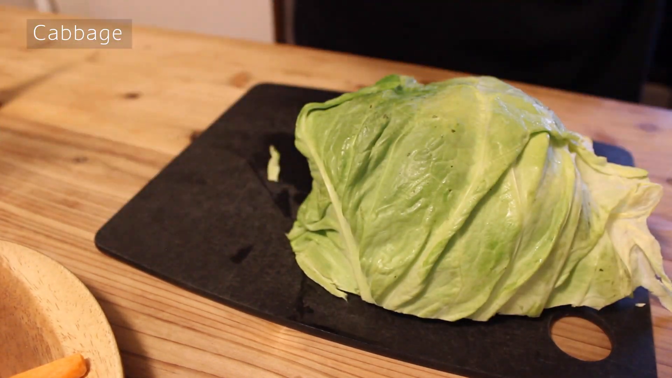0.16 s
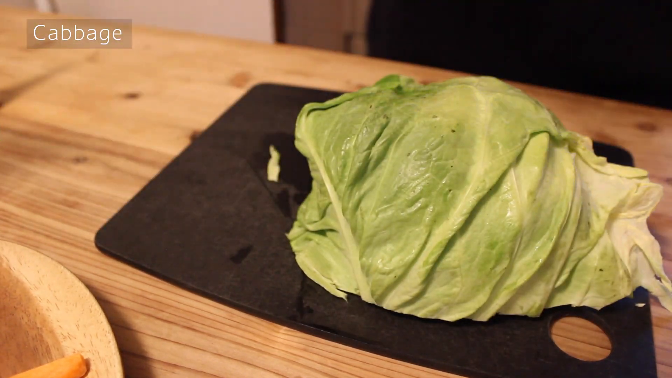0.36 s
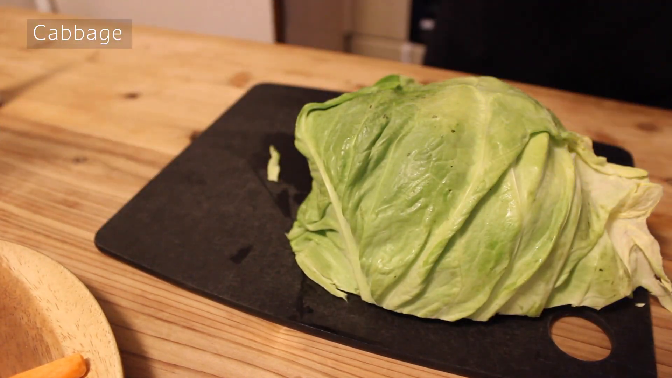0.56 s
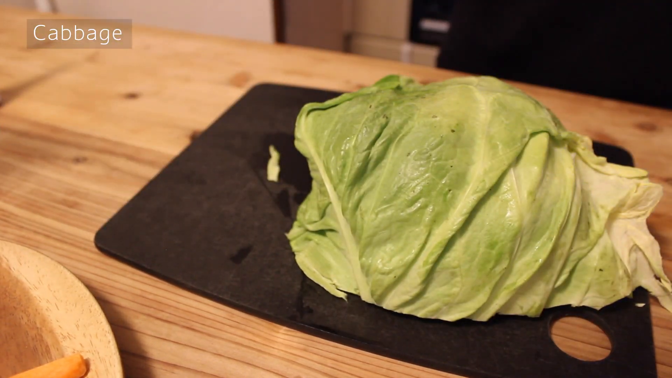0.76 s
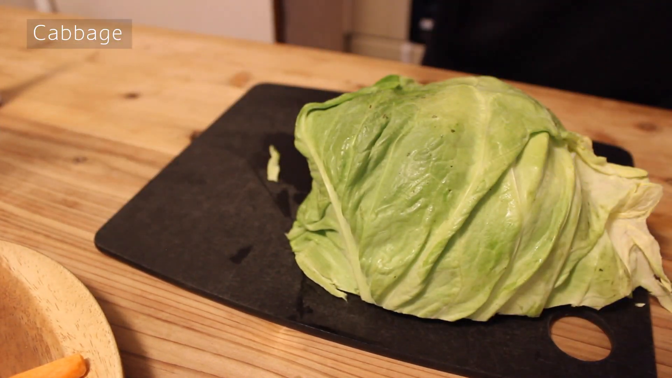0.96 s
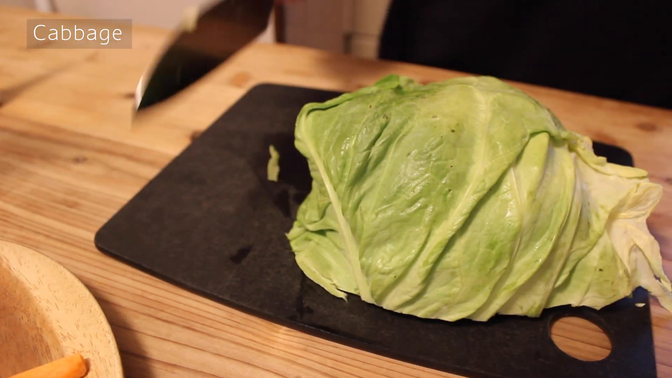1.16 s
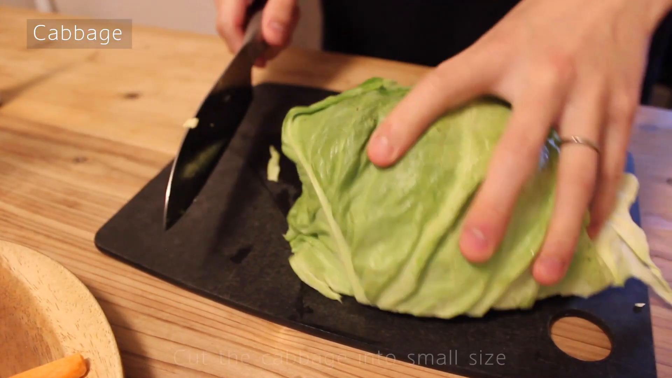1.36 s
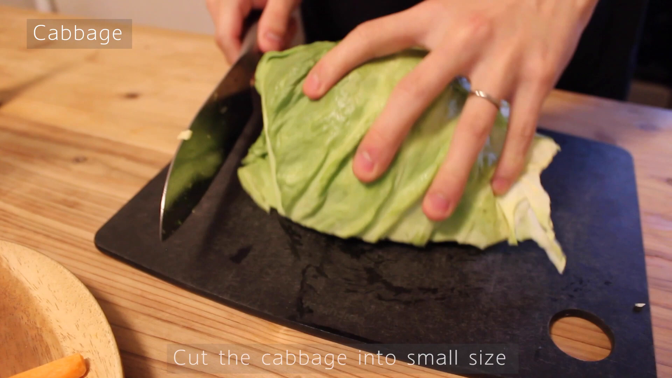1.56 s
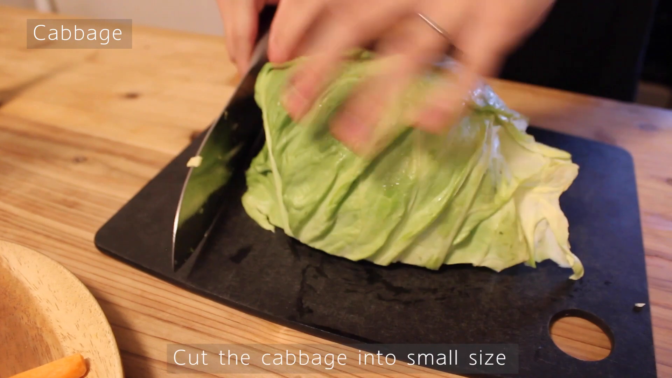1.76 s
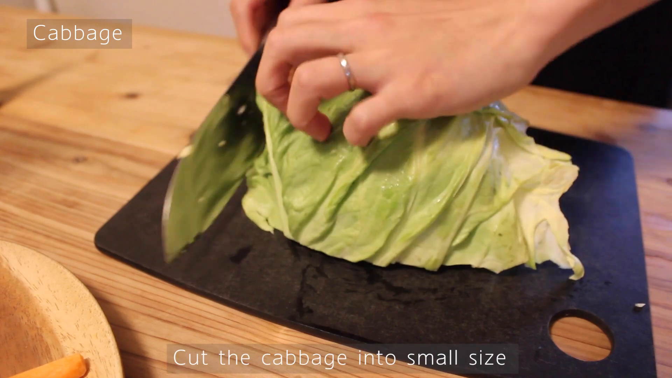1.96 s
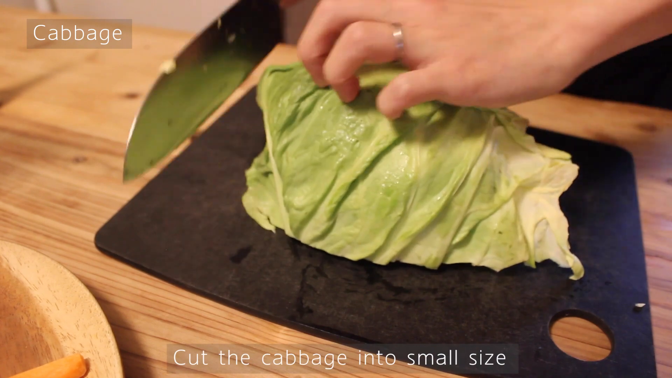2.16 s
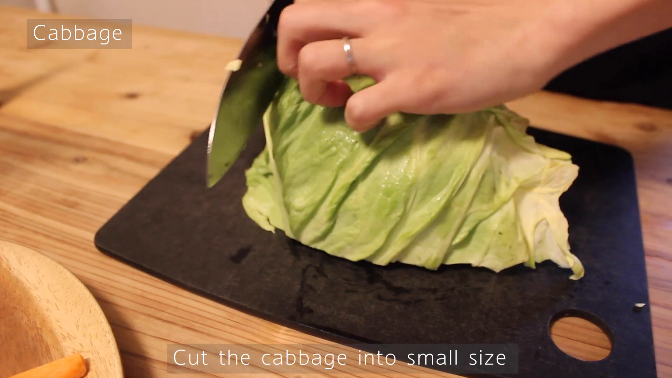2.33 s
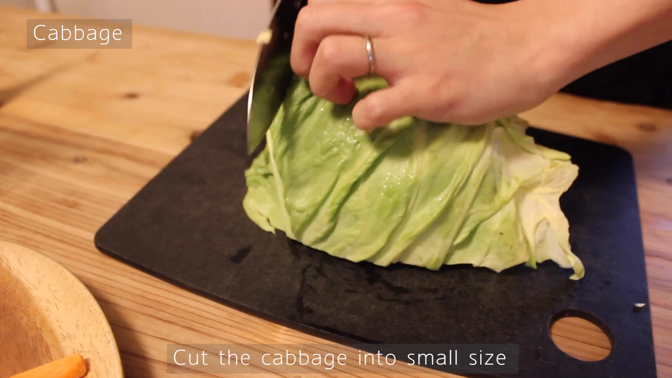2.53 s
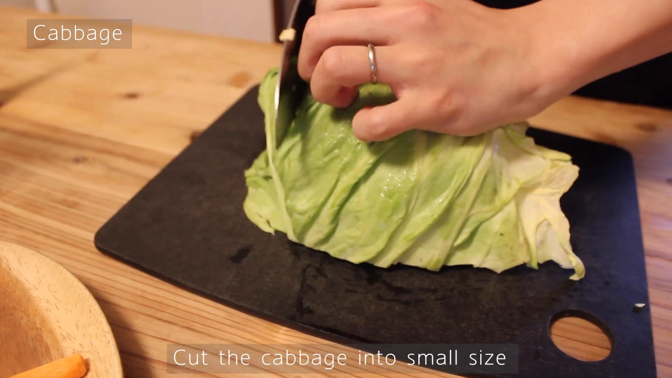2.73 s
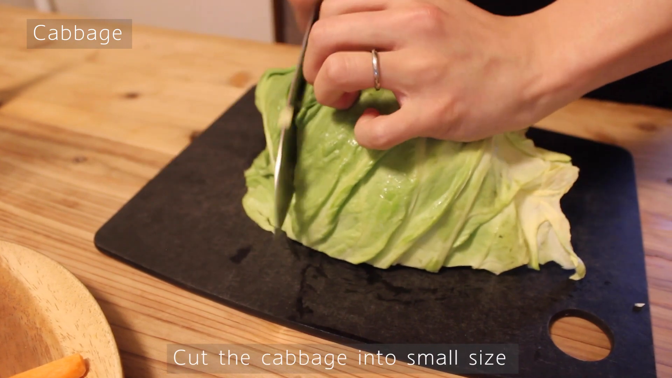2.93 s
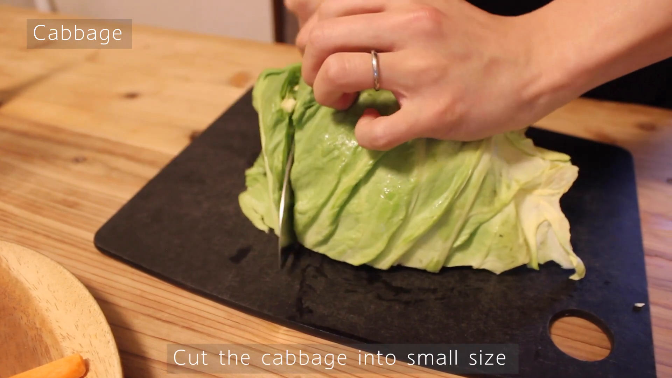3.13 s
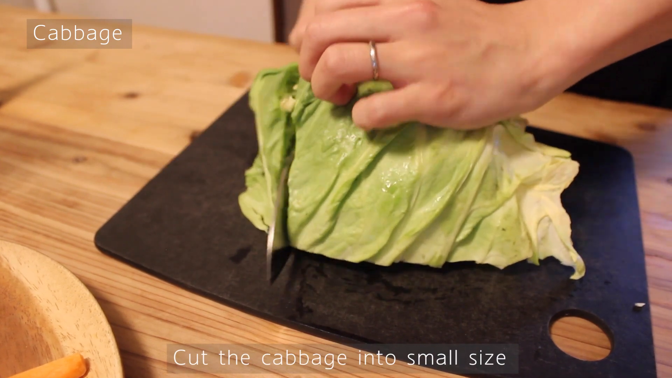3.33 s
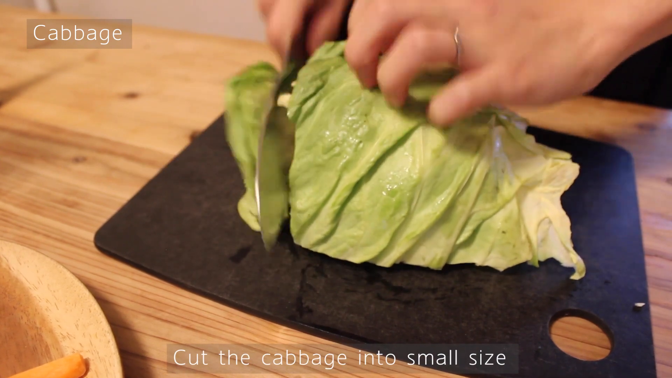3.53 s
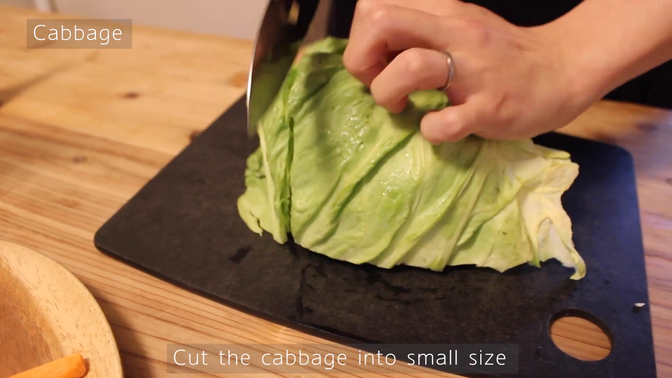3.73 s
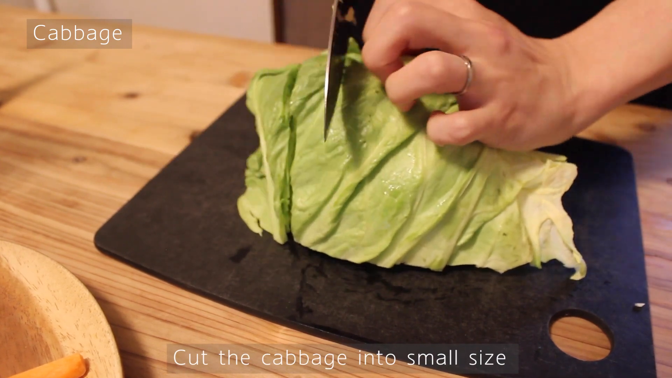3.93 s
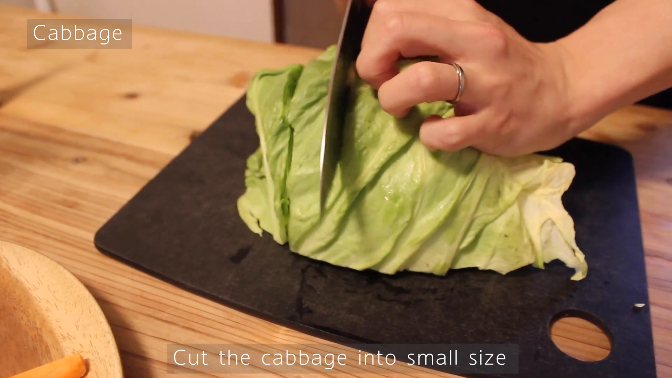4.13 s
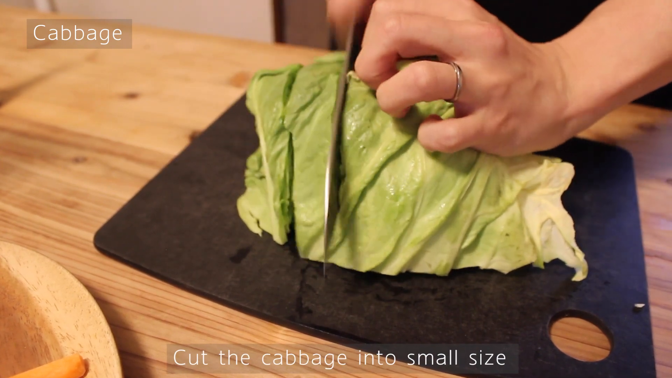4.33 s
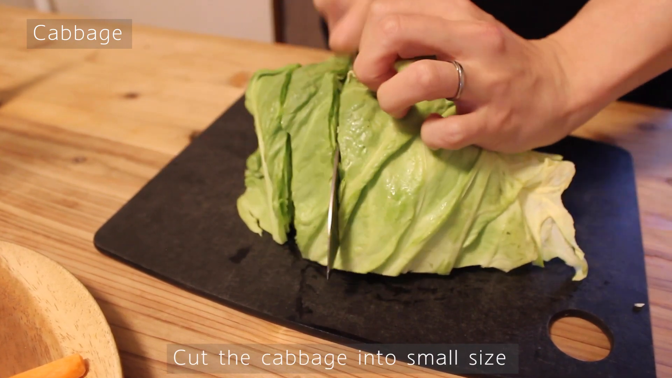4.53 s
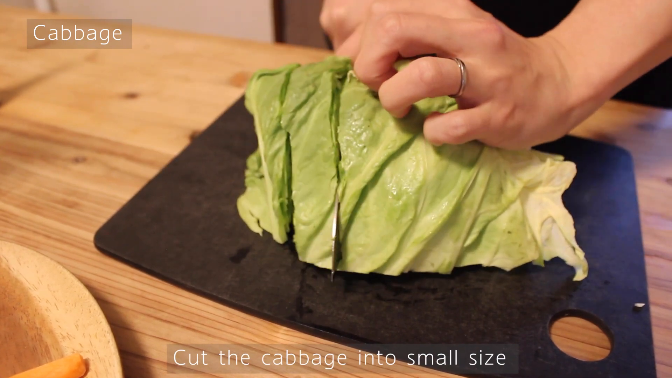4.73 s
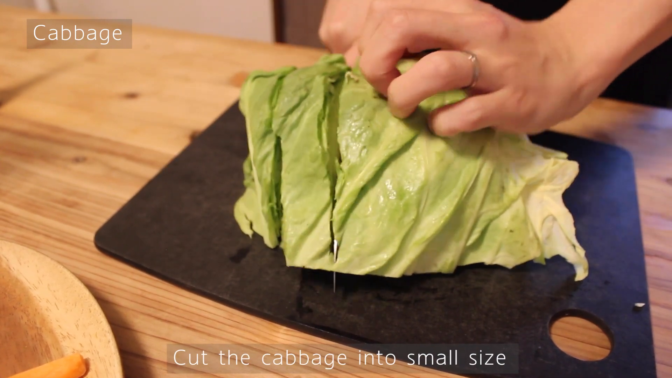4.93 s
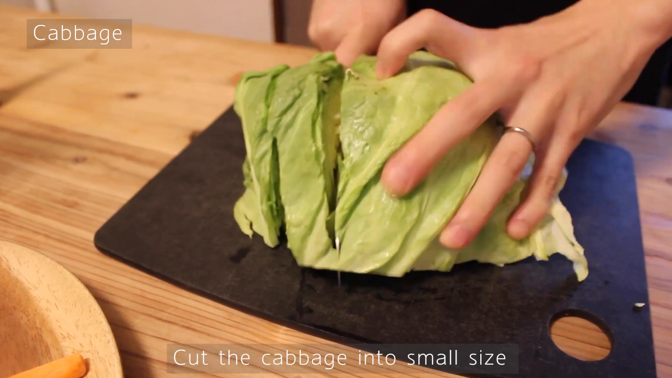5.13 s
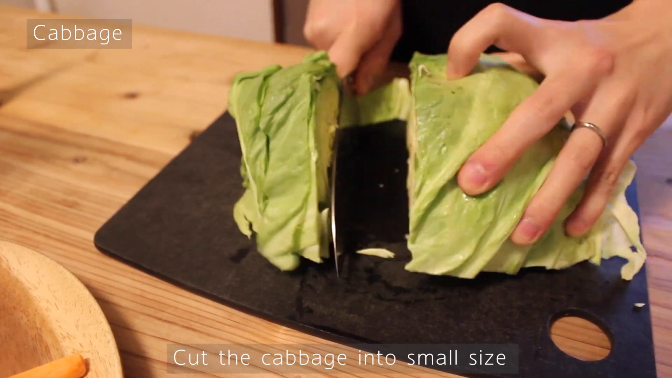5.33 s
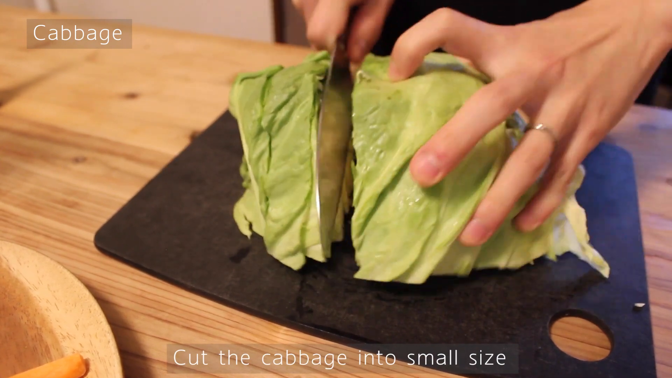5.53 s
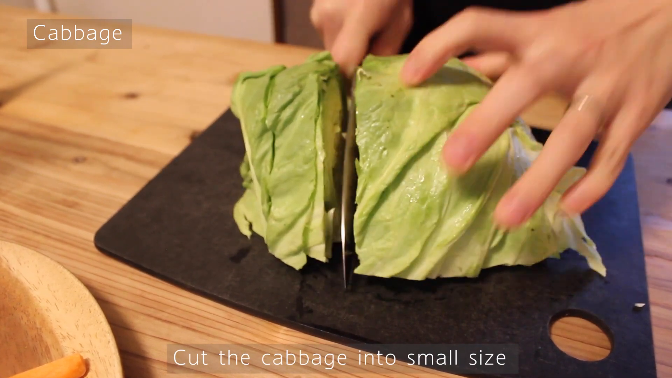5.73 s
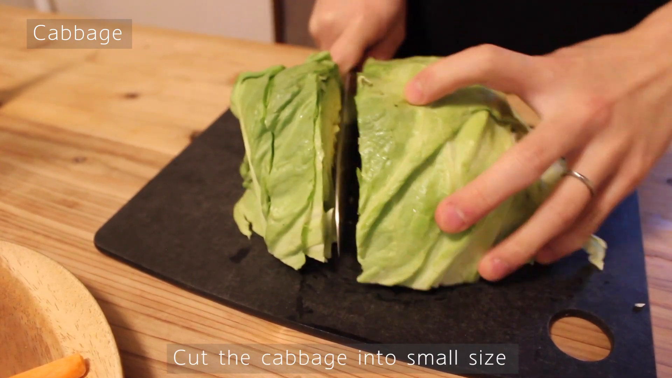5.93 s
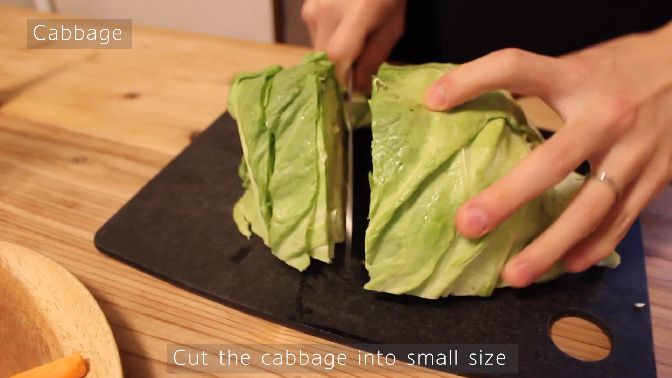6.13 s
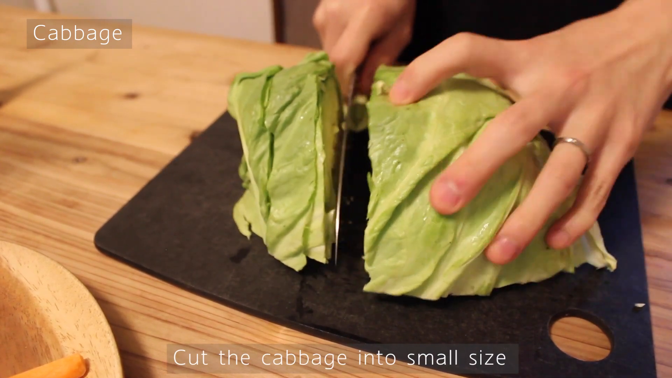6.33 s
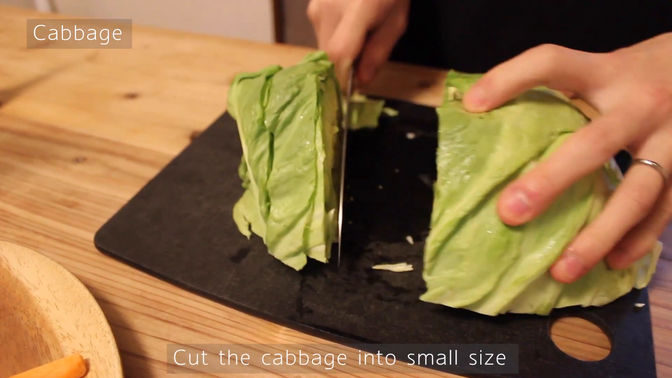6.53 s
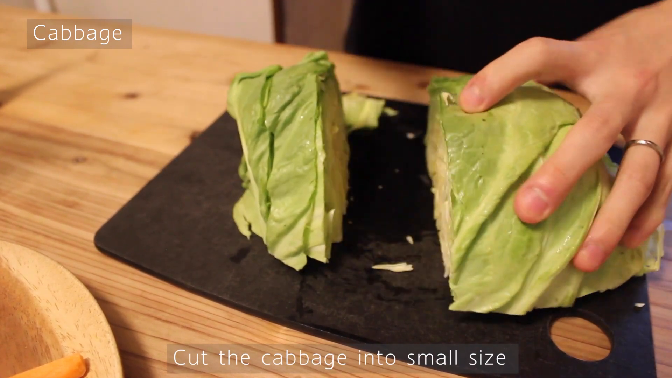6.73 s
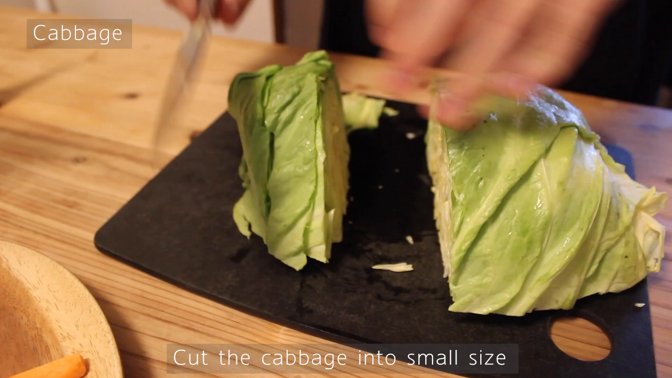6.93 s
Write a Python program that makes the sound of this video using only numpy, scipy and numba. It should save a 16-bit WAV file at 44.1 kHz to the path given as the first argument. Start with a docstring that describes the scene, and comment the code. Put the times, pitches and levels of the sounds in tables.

```python
"""In a small room, a kitchen knife is pushed through a cabbage on a thin plastic board, close to a
camera microphone. Over steady hiss, leaves tear as a dense random crackle shaped in three bands,
and ribs snap as clicks with a few cycles of ring. Each chop knocks twice on the board in quick
succession, sounding damped modes, and the blade rings faintly; decaying noise in bands forms the echo."""
import sys
import numpy as np
from scipy import signal
from scipy.fft import rfft, irfft
from scipy.io import wavfile
from numba import njit

SR = 44100
rng = np.random.default_rng(int(sys.argv[2]) if len(sys.argv) > 2 else 0)


def store_wav(level_fs):
    """Save 16-bit WAV to argv[1]."""
    pcm = np.round(np.clip(np.atleast_2d(level_fs), -1, 1) * 32767)
    wavfile.write(sys.argv[1], SR, pcm.T.astype(np.int16))


N = 312669  # length [samples]


def undb(db):
    """Level law: decibels to amplitude gain."""
    return 10 ** (np.asarray(db) / 20)


def unit(x):
    """Normalisation: scale to rms 1."""
    return x / np.sqrt(np.mean(x ** 2))


def add(out, start, x):
    """Superposition: mix x into out from a start time in seconds."""
    i = int(start * SR)
    out[i:i + len(x)] += x[:N - i]


def colour(x, table):
    """Minimum-phase filtering: the folded cepstrum of a log gain gives a causal response."""
    hz, db = np.transpose(table)
    grid = np.maximum(np.arange(1025) * SR / 2048, 1)
    gain_db = np.interp(np.log(grid), np.log(hz), db)
    cepstrum = irfft(np.log(undb(gain_db)))
    # fold the anticausal half onto the causal half
    cepstrum[1:1024] *= 2
    cepstrum[1025:] = 0
    response = irfft(np.exp(rfft(cepstrum)))[:1024]
    return signal.fftconvolve(x, response)[:len(x)]


def burst(table, t60, size):
    """Transient noise: exponentially fading noise (t60 in s), then coloured, peak 1."""
    t = np.arange(size) / SR
    x = colour(rng.standard_normal(size) * 1000. ** (-t / t60), table)
    return x / np.abs(x).max()


def ring(modes, scatter_db, size):
    """Modal superposition: damped sines, whose signs and weights each blow draws anew."""
    t = np.arange(size) / SR
    chance = rng.standard_normal((len(modes), 2))
    total = np.zeros(size)
    for (sign, scatter), (hz, db, t60) in zip(chance, modes):
        gain = np.sign(sign) * undb(db + scatter_db * scatter)
        total += gain * np.sin(2 * np.pi * hz * t) * 1000. ** (-t / t60)
    return total


@njit
def gliding_bandpass(x, hz, sharp):
    """State-variable resonance: a band-pass whose centre moves every sample; sharp is its Q."""
    y, band, low, damping = np.empty(len(x)), 0., 0., 1 / sharp
    for i in range(len(x)):
        g = np.tan(np.pi * hz[i] / SR)
        v = (band + g * (x[i] - low)) / (1 + g * (g + damping))
        band, low, y[i] = 2 * v - band, low + 2 * g * v, damping * v
    return y


# Spectrum of the microphone hiss: (frequency [Hz], relative level [dB])
HISS_SPECTRUM = [(12, -55.5), (20, -4.5), (27, -31.5), (293, -20.5), (337, -24), (377, -20.5), (527, -19.5),
                 (590, -20), (1530, -20.5), (2750, -21.5), (5680, -24), (13500, -27.5), (16000, -30)]
HISS_DB = -63.5  # rms level before the recorder [dB]


def microphone_hiss():
    """Stationary noise: random samples shaped to a fixed spectrum."""
    return undb(HISS_DB) * unit(colour(rng.standard_normal(N), HISS_SPECTRUM))


# Reverberation by band: (centre frequency [Hz], decay time t60 [s], initial level [dB])
ROOM_BANDS = [(217, 0.19, -3.5), (496, 0.29, -2), (1067, 0.29, -2), (2000, 0.3, -5.5), (3400, 0.29, -2),
              (5400, 0.28, -0.5), (8000, 0.096, 1.5), (13850, 0.18, 3.5)]
ROOM_DB = -6  # gain of the unit-energy echo response [dB]


def room(x):
    """Diffuse reverberation: convolution with noise whose bands each decay at their own rate."""
    t = np.arange(int(.5 * SR)) / SR
    octaves = np.log2(np.fft.rfftfreq(len(t), 1 / SR) + 1)
    centres = np.log2([hz for hz, _, _ in ROOM_BANDS])
    tail = np.zeros(len(t))
    for k, (_, t60, db) in enumerate(ROOM_BANDS):
        # neighbouring bands crossfade in power
        share = np.sqrt(np.interp(octaves, centres, np.arange(len(ROOM_BANDS)) == k))
        band = irfft(rfft(rng.standard_normal(len(t))) * share, len(t))
        tail += undb(db) * band * 1000. ** (-t / t60)
    # echoes begin after 2 ms, past the nearest surfaces, and build up over 5 ms
    tail *= np.clip((t - .002) / 0.005, 0, 1)
    tail /= np.sqrt(np.sum(tail ** 2))
    return undb(ROOM_DB) * signal.fftconvolve(x, tail)[:N]


def crackle(rate, spread_db, bed):
    """Shot noise: cells burst at random (rate per s) in uneven sizes over a finer rustle."""
    chance = rng.random((2, N))
    sizes = undb(-spread_db * np.log(chance[1] + 1e-9))
    clicks = (chance[0] < rate / SR) * sizes
    # the clicks, sized and given random signs and strengths, are divided by the rms of their sizes alone
    signed = unit(clicks) * rng.standard_normal(N)
    return unit(signed + bed * rng.standard_normal(N))


# Leaves tear or rub, one row a swell; the row at 5.049 s is the lingering tail after a chop:
# (time of full strength [s], rise [s], hold [s], fall [s], flesh level [dB],
#  crispness re flesh [dB], depth re flesh [dB], leaf pitch [Hz])
TEARS = [(.142, 0.018, 0.0028, 0.037, -57.5, -9, -5, 1266), (1.38, .015, 0.024, 0.054, -58, 3, -5, 1257),
         (1.446, .03, .01, .04, -58, -13, -6, 1580), (1.48, .03, 0.11, 0.092, -57, -7, -9, 1419),
         (1.691, 0.064, 0.0023, 0.077, -52, -3, -13.5, 1898), (2.065, .012, .003, .015, -70, 10, -12, 1400),
         (2.116, .06, 0.003, 0.022, -60.5, 4, -7, 1510), (2.37, .05, 0.0022, 0.032, -75, 10.5, -18, 1603),
         (2.637, 0.048, 0.0027, .03, -65, 6.5, -26, 1560), (2.812, .015, .02, .05, -62, 7.5, -17, 1560),
         (2.884, 0.071, 0.061, 0.035, -42, -2.5, -2.5, 1650),
         (3.003, 0.045, 0.003, .035, -53, -2, -14, 1917), (3.056, 0.026, 0.003, .04, -50, -7, -4, 1750),
         (3.094, 0.046, 0.026, 0.027, -42, -0.9, -5, 1880),
         (3.306, 0.088, 0.0026, .021, -43.5, -4, -4.5, 1630), (3.445, .03, 0.058, .08, -64.5, 9, -11, 1700),
         (3.506, .03, .003, 0.076, -60, 4, 1, 1650), (3.596, .025, 0.003, .03, -61.5, -1, -15, 1468),
         (3.745, .14, 0.003, 0.12, -65.5, 4, -9.5, 1710),
         (3.926, 0.041, 0.004, .06, -68.5, 10.5, -18, 1533), (4.15, 0.013, .02, .05, -53.5, 8, 1, 1010),
         (4.194, 0.052, .045, 0.015, -44.5, 3.5, -1.5, 1423),
         (4.272, .021, 0.003, 0.16, -59.5, 3, -11, 1664), (4.331, .05, 0.003, .021, -59, -9, -2, 1513),
         (4.375, 0.018, .06, 0.039, -38.5, -4.5, -4, 1464),
         (4.473, 0.023, 0.019, 0.16, -48.5, -4.5, -6.5, 1410),
         (4.56, 0.017, 0.022, .06, -55.5, -2, 2, 1480), (4.612, 0.1, 0.003, 0.032, -42.5, -5, -11.5, 1749),
         (4.671, 0.046, 0.003, .08, -47.5, -7, -11.5, 1798),
         (4.705, 0.045, 0.0082, 0.03, -53.5, -14, 0, 1380), (4.754, .015, .003, .08, -45, -4, -11, 1400),
         (4.786, 0.1, 0.003, 0.032, -40.5, -6.5, -6, 1490), (4.863, .12, 0.025, .05, -54, -5, -9.5, 1900),
         (4.951, 0.095, 0.003, .021, -42, -5.5, -7, 1608),
         (5.049, 0.038, 0.033, 0.066, -55.5, -3.5, -15, 1600),
         (5.189, 0.19, 0.37, .11, -61, -5.5, -17, 1588), (5.27, 0.11, 0.003, 0.065, -57, -11, -11, 1636),
         (5.352, .08, 0.003, 0.092, -58.5, 2.5, -10.5, 1607),
         (5.453, .06, 0.0031, .06, -70.5, 10.5, -17, 1489), (5.608, .06, 0.003, .05, -54.5, 2.5, -32, 1875),
         (5.93, 0.026, 0.003, 0.1, -50, -13, -6.5, 1165), (6.05, 0.13, 0.033, .08, -51.5, -7, -11.5, 1100),
         (6.1, 0.055, 0.014, 0.042, -50.5, -19, -3, 800), (6.136, .06, 0.003, .05, -57, -17, 0.5, 718),
         (6.252, .015, 0.003, .03, -63, -1, -27, 1590), (6.469, 0.019, 0.083, .07, -59, -4, -9.5, 1822),
         (6.692, .02, 0.023, 0.065, -64.5, -6, -21, 1700),
         (6.736, 0.082, 0.003, 0.061, -52, -11.5, -21.5, 1650),
         (6.868, 0.087, 0.003, 0.043, -70.5, -3, -21, 1826)]
# Spectra of the flesh, the thin crisp edges and the whole head: (frequency [Hz], relative level [dB])
FLESH = [(380, -40.5), (650, 6), (1110, 1), (1550, 4), (1920, 2), (2260, 2.5), (3600, 1.5), (4680, -49.5),
         (7920, -120)]
CRISP = [(2120, -19), (3600, -4.5), (4860, -2.5), (6550, -6), (9240, -13), (9890, -11), (12900, -18),
         (15100, -21.5), (16000, -19)]
DEEP = [(35, -47), (60, -22), (238, -9), (312, -11.5), (367, -5), (519, -2), (800, 2), (1040, -43),
        (1760, -120)]
SWELL_DB = 25  # climb over each rise, and drop over each fall [dB]


def tearing():
    """Enveloped shot noise: crackle in flesh, crisp edges and whole head swells, holds and fades."""
    t, powers = np.arange(N) / SR, np.zeros((3, N))
    for start, rise, hold, fall, flesh_db, crisp_db, deep_db, _ in TEARS:
        near = slice(int((start - 2 * rise) * SR), int((start + hold + 2 * fall) * SR))
        before = (start - t[near]) / rise
        after = (t[near] - start - hold) / fall
        away = np.maximum(np.maximum(before, after), 0)
        layers_db = np.array([[0], [crisp_db], [deep_db]])
        # overlapping swells add in power
        powers[:, near] += undb(flesh_db - SWELL_DB * away + layers_db) ** 2
    flesh_gain, crisp_gain, deep_gain = np.sqrt(powers)

    cells = crackle(rate=1600.0, spread_db=1.0, bed=0.66)
    fine = crackle(rate=1800., spread_db=2.1, bed=.6)
    # the leaf that is being worked favours its own pitch, gliding from row to row
    rows = np.array(TEARS)
    leaf_hz = np.interp(t, rows[:, 0], rows[:, -1])
    flesh = colour(cells, FLESH)
    resonant = gliding_bandpass(gliding_bandpass(flesh, leaf_hz, 0.61), leaf_hz, 0.61)
    flesh = unit(0.41 * flesh + resonant)
    # the same bursts drive every layer; the crisp edges add sharper ones
    crisp = unit(colour(0.54 * cells + fine, CRISP))
    deep = unit(colour(cells, DEEP))
    return flesh_gain * flesh + crisp_gain * crisp + deep_gain * deep


# Ribs and leaves snap, and one small low knock sounds at 1.946 s:
# (time [s], overall level [dB], ring frequency [Hz], click level re overall [dB])
SNAPS = [(0.8704, -44, 1970, -9), (1.3738, -51, 1180, 5), (1.483, -37.5, 1130, -19),
         (1.6837, -42, 1760, -7), (1.946, -40.5, 482, -27), (2.0925, -45, 5870, -3),
         (2.1101, -46, 4600, -3), (2.8379, -31.5, 1600, 1.5), (2.8473, -32, 1720, -14),
         (2.8705, -22, 1630, 2), (2.8784, -27.5, 5060, 2), (2.8898, -14, 4930, 1), (2.896, -28, 2480, 1),
         (2.9951, -31, 3230, -14), (3.0587, -31, 1880, -13), (3.219, -32, 6000, -3),
         (3.269, -43, 1990, -12.5), (3.5888, -40, 1750, 5.5), (3.699, -40, 4970, -1),
         (3.911, -33.5, 5270, -7.5), (4.1397, -33, 5350, 6.5), (4.1755, -23.5, 5650, -4),
         (4.3036, -45, 1530, -3), (4.1894, -16.5, 5540, -9), (4.2, -14, 4950, -15),
         (4.2125, -24, 1820, -13), (4.237, -22.5, 2500, -12), (4.5468, -32, 2620, -14),
         (4.6628, -26.5, 4270, -15), (4.7455, -32, 1320, -15), (5.1477, -43, 1830, -9),
         (5.2625, -43, 1590, -5), (5.4236, -42, 1590, -3), (5.4484, -43, 1200, -10), (5.453, -37, 8600, 0),
         (5.459, -42, 8000, 1), (5.5894, -42.5, 4470, 4.5), (5.6149, -43, 1700, 0),
         (5.6294, -43, 1870, -10), (5.697, -50, 2000, -7.5), (6.621, -45, 5220, 1.5),
         (6.6904, -40, 1550, -13), (6.847, -45, 6140, -0.5)]


def snaps():
    """Impulsive transients: a click, a short rustle and a few cycles of damped ring sound together."""
    out, t = np.zeros(N), np.arange(1500) / SR
    for start, db, hz, click_db in SNAPS:
        # the ring falls to 1/e in 3.9 cycles
        tone = np.sin(2 * np.pi * hz * t) * np.exp(-t * hz / 3.9)
        click = undb(click_db) * burst(CRISP, 0.0023, size=1500)
        rustle = 0.22 * burst(FLESH, 0.022, size=1500)
        add(out, start, undb(db) * (0.47 * tone + click + rustle))
    return out


# Modes of the thin board: (frequency [Hz], relative level [dB], decay time t60 [s])
BOARD_MODES = [(460, -9, .04), (670, -8, .03), (850, -5, .025), (1010, -4, .025), (1250, -4, .02),
               (1440, -2, .02), (1600, -1, .02), (1810, 0, .02), (2200, -3, .015), (2460, -2, .015),
               (2820, -2, .015), (3150, -4, .012)]
# Spectrum of the clack and rattle: (frequency [Hz], relative level [dB])
KNOCK_SPECTRUM = [(530, -39.5), (900, -5.5), (1280, -5.5), (1890, 0.5), (2400, -4), (3100, -8.5),
                  (3700, -17.5), (5000, -29), (8400, -74)]


def knock(clack_db):
    """Plate impact: a clack, a dense rattle against the table and quickly damped modes."""
    board = ring(BOARD_MODES, 1.1, size=8000)
    clack = colour(np.arange(8000) == 0, KNOCK_SPECTRUM)
    rattle = 0.4 * burst(KNOCK_SPECTRUM, 0.11, size=8000)
    return undb(clack_db) * clack / np.abs(clack).max() + rattle + board / np.abs(board).max() / 6


# Blade meets board: (time [s], overall level [dB], edge tick [dB], glint [dB], thud [dB],
#  blade ring re tick [dB], second contact delay [s], second contact [dB], clack hardness [dB],
#  brightness [dB per octave]); tick, glint, thud and second contact are relative to overall
CHOPS = [(1.778, -10.5, -5, -17, -11, -26, 0.00086, 8.5, -13.5, 1.3),
         (3.1334, -7, -5.5, -21, -13.5, -65, 0.0026, -0.7, -1.3, -1),
         (3.3157, -8.5, -4, -15.5, -12, -74, 0.0013, 7, 0.7, 1),
         (4.957, -10.5, -9.5, -21, -14.5, -55, 0.0014, 4.5, -3.5, -0.6),
         (5.791, -7, -8.5, -20, -16.5, -41, 0.002497, 0.7, -7, -0.3),
         (6.3323, -7, -8, -20, -11.5, -63.5, 0.001134, 5.5, 0.5, 2)]
# Modes of the blade: (frequency [Hz], relative level [dB], decay time t60 [s])
BLADE_MODES = [(6420, 0, .2), (7550, -5, .2), (8400, -2, .12), (11380, -5, .16), (12400, -11, .1),
               (14000, -14, .1), (15600, -12, .1)]
# Spectra of the edge tick, the first touch of the edge and the thud: (frequency [Hz], relative level [dB])
TICK = [(2240, -24), (3800, -1.5), (5000, 0), (7200, -11.5), (9800, -16.5), (13200, -34), (16000, -41)]
GLINT = [(5500, -32.5), (8000, -5.5), (10500, -0.5), (13000, -5.5), (16000, -7.5)]
THUD = [(71, -45), (120, -32.5), (436, -6), (611, -3.5), (900, -2), (1170, -45), (1980, -120)]


def chops():
    """Double impact: heel and edge land a moment apart; board knocks, blade ticks, chatters and sings."""
    out = np.zeros(N)
    for start, db, tick_db, glint_db, thud_db, blade_db, lag, second_db, clack_db, bright_db in CHOPS:
        tick = burst(TICK, 0.0023, size=9000)
        chatter = 0.5 * burst(TICK, 0.048, size=9000)
        singing = undb(blade_db) * ring(BLADE_MODES, 1.8, size=9000)
        add(out, start, undb(db + tick_db) * (tick + chatter + singing))
        add(out, start, undb(db + thud_db) * burst(THUD, 0.089, size=9000))
        add(out, start, undb(db + glint_db) * burst(GLINT, 0.0028, size=1500))
        # a cleaner strike of the edge makes the board sound brighter
        tilt = [(425, -2 * bright_db), (6800, 2 * bright_db)]
        # the two contacts have opposite polarity
        add(out, start, -undb(db) * colour(knock(clack_db), tilt))
        add(out, start + lag, undb(db + second_db) * colour(knock(clack_db), tilt))
    return out


BASS_CUT_HZ = 120


def scene():
    """Superposition of sources: knife and cabbage, their echo, and the hiss."""
    # the microphone picks up little of the deep bass
    bass_cut = signal.butter(3, BASS_CUT_HZ, "high", fs=SR, output="sos")
    near = signal.sosfilt(bass_cut, tearing() + snaps() + chops())
    return (near + room(near) + microphone_hiss())[None]


TOP_HZ = 15900  # upper band limit of the recorder
OFFSET = .0008  # constant shift [fraction of full scale]


def record(dry):
    """Saturation and band limiting: peaks near full scale round off, the top is cut, zero is shifted."""
    rounded = dry / (1 + np.abs(dry / .98) ** 4) ** .25
    top_cut = signal.ellip(10, .2, 60, TOP_HZ, fs=SR, output="sos")
    return signal.sosfilt(top_cut, rounded) + OFFSET


dry = scene()
out = record(dry)
store_wav(out)
```